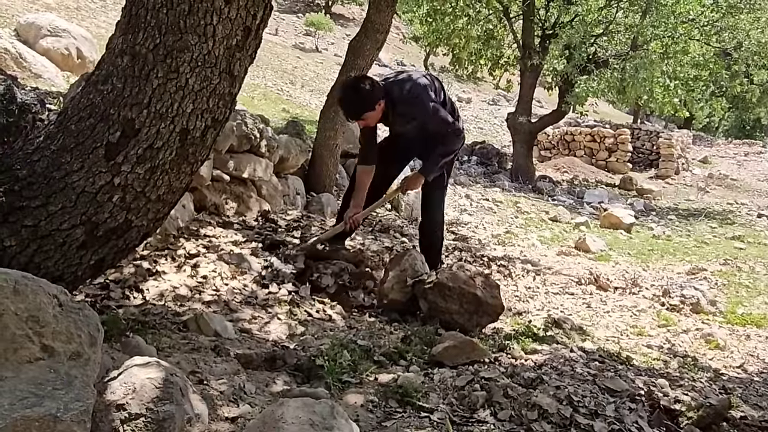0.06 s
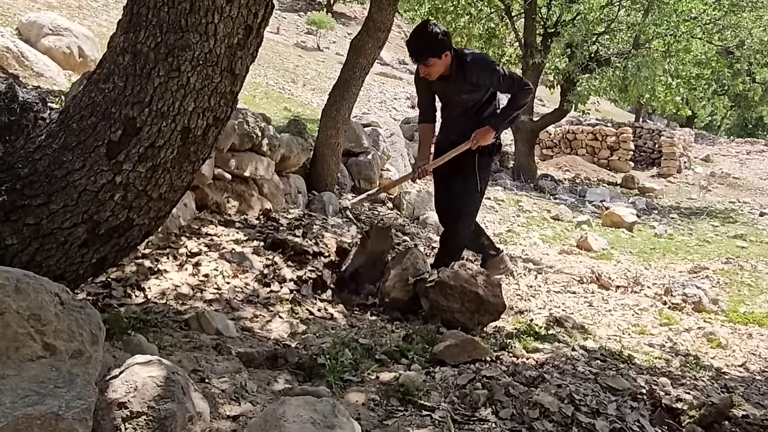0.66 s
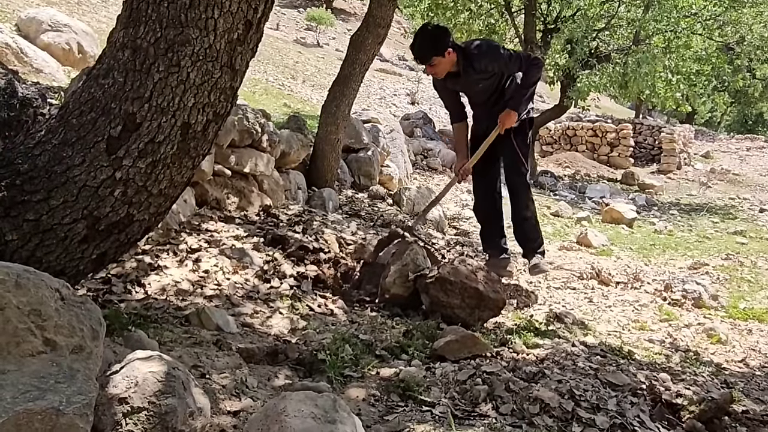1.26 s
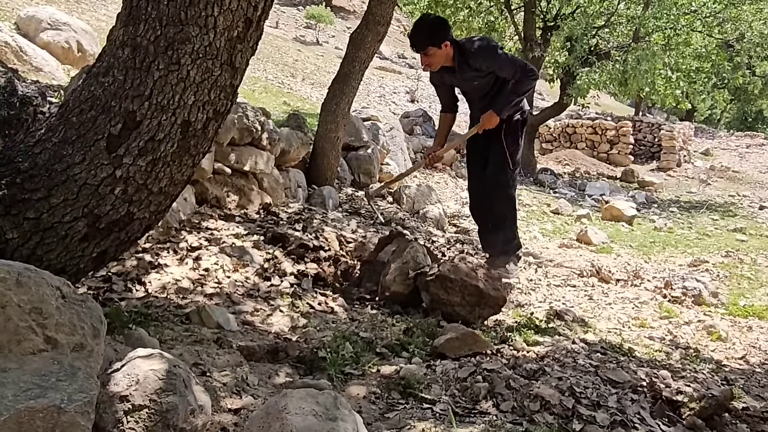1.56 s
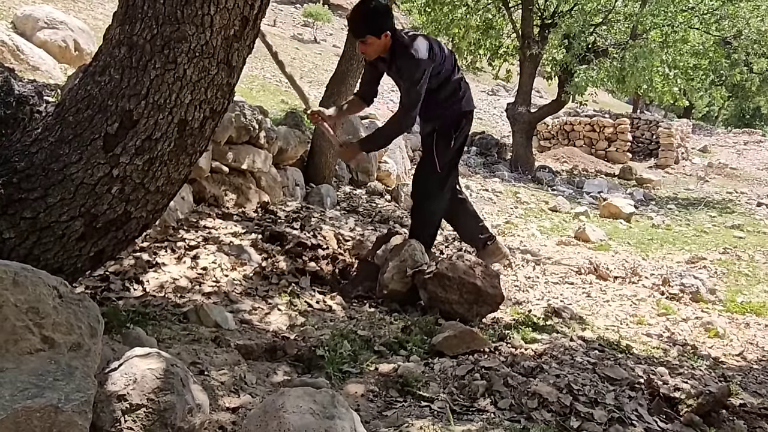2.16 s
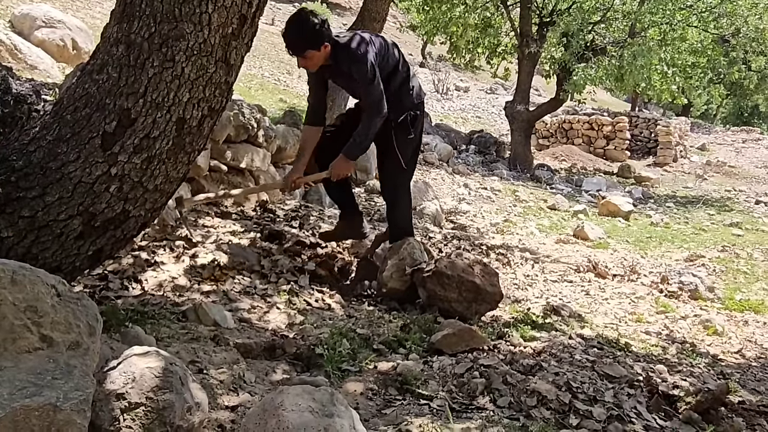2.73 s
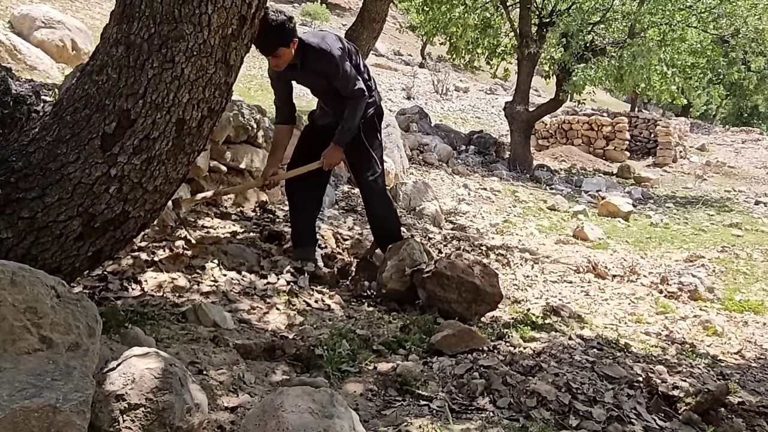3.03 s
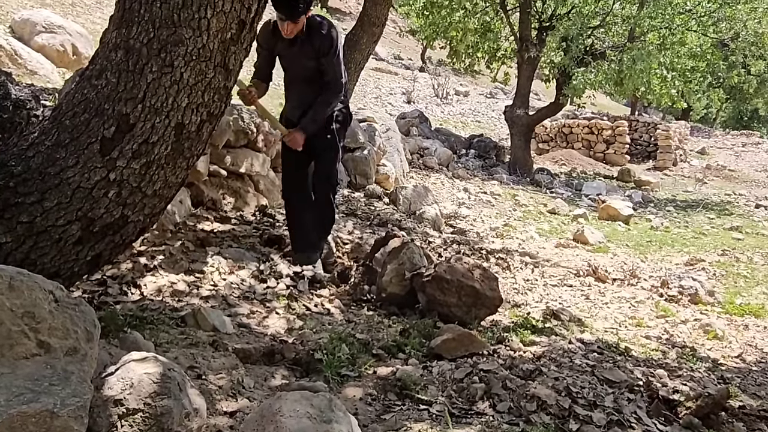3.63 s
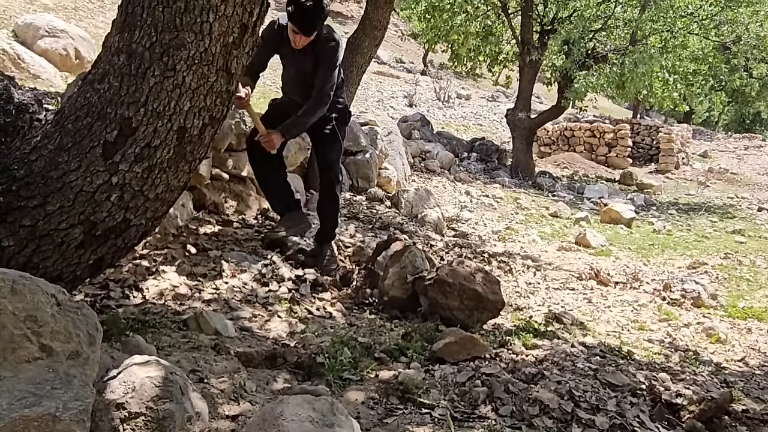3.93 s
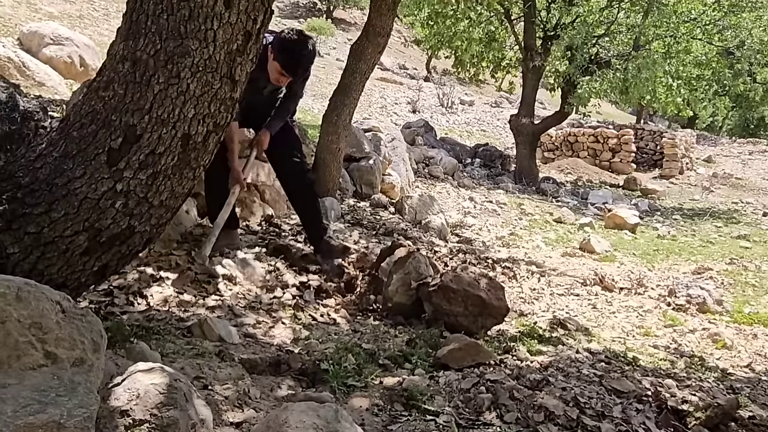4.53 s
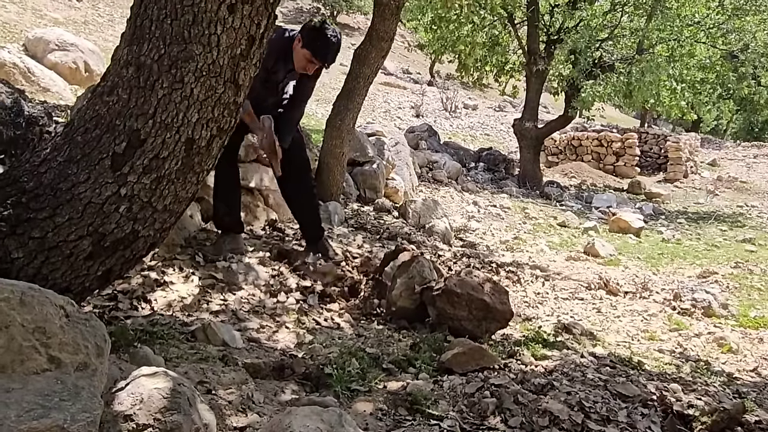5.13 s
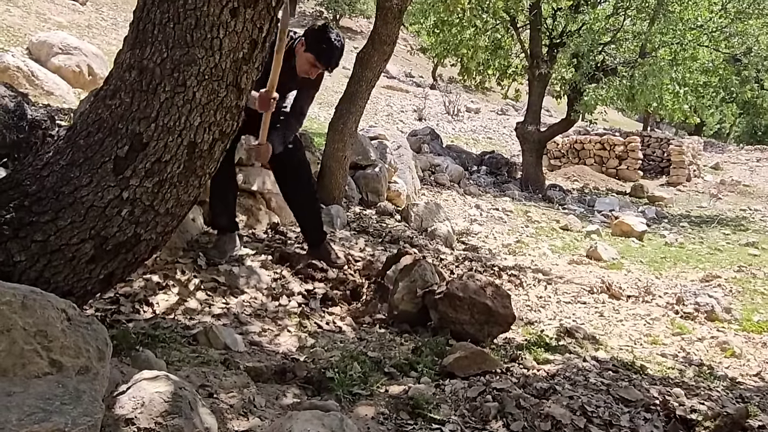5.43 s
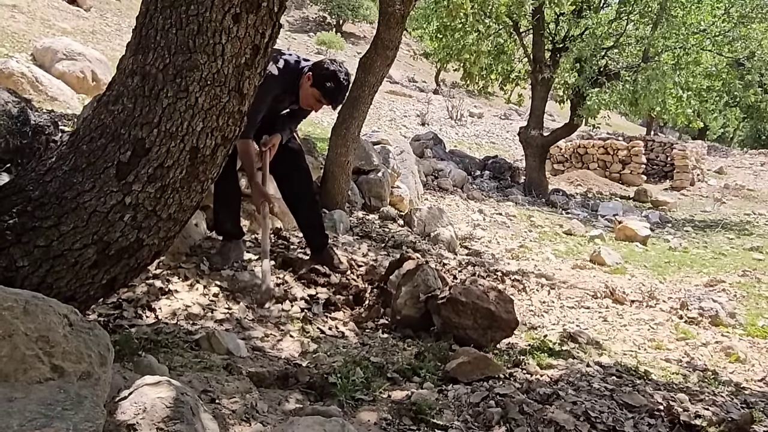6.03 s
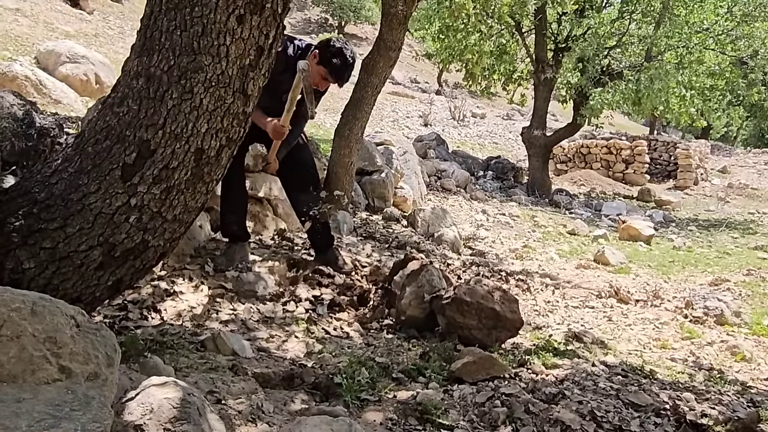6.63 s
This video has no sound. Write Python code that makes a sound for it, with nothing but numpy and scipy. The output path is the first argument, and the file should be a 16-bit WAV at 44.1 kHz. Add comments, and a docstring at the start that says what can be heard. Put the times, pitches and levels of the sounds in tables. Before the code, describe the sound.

For the first second and a half, a rock is dragged through loose rubble: gravel scrapes and rattles, chips click, and stones knock together with soft, low thuds. Small slides of gravel follow as the footing shifts. At about 2.4 seconds a pick hits stone with a sharp, loud clack, a brief steel ring and a spray of grit. Quieter stone knocks come near 2.8 and 3.5 seconds. At about 4.1 seconds a second loud blow lands with a fuller knock, followed by crunching gravel and a bright click. Rubble slides again around 5.2 seconds. A faint swish leads into a third, much softer blow that sinks into gravel at 5.7 seconds. Sand trickles, and another short slide comes near 6.6 seconds. The work sounds slightly to the left, outdoors with very little echo, over faint open air and a low distant rumble.

```python
"""Outdoors, among trees and dry stone walls, stony ground is worked with a pick.
A rock is dragged aside through loose rubble, then three blows fall: two clack on stone, the last
sinks into gravel. Each step or pull of the pick sets off a small slide that swells and dies away.
Stones knock, chips click and sand trickles over a low distant rumble."""
import sys
import numpy as np
from scipy import signal
from scipy.fft import rfft, irfft, next_fast_len
from scipy.io import wavfile
from scipy.ndimage import uniform_filter1d

SR = 44100
rng = np.random.default_rng(int(sys.argv[2]) if len(sys.argv) > 2 else 0)


def pcm_store(signal):
    """Save signal as 16-bit PCM."""
    levels = np.round(np.clip(np.atleast_2d(signal), -1, 1) * 32767)
    wavfile.write(sys.argv[1], SR, levels.astype(np.int16).T)


N = 299435

# The pick's blows. Each row: start in seconds, knock level in dB, knock treble limit in Hz, steel ring,
# crack and thud levels in dB, thud pitch in Hz, thud delay in seconds, grit spray level in dB,
# spray fade time in seconds, far echo level in dB.
BLOWS = [(2.3948, -17.5, 1800, -31, -9.5, -19.5, 105.3, 0.0025, -15.5, 0.18, -44),
         (4.1457, -8, 2423, -38, -10, -21.5, 85, 0.0075, -19, 0.22, -48),
         (5.6835, -26.5, 490, -50, -24, -27.5, 77, .020, -28.5, 0.17, -74)]
# The tone of fine grit. Each row, as in every tone table: frequency in Hz, relative level in dB.
GRIT_TONE = [(3500, -32), (5500, -2), (6500, -2), (7500, 0.5), (8600, -1), (9800, -2.5), (11500, -2.5),
             (13500, -7.5), (16000, -9)]


def from_db(db):
    """Turns decibels into a factor to multiply by."""
    return 10 ** (np.asarray(db) / 20)


def rms_one(x):
    """Scales a signal to an average (rms) strength of 1."""
    return x / np.sqrt(np.mean(x ** 2) + 1e-20)


def dying(t, t60):
    """A fade that starts at t = 0 and loses 60 dB in t60 seconds, the fade time."""
    return (t >= 0) * from_db(-60 * np.clip(t / t60, 0, 5))


def swell(start, rise_s, t60):
    """A level that rises, then dies away."""
    t = np.arange(N) / SR - start
    return np.clip(t / rise_s, 0, 1) * dying(np.maximum(t - rise_s, 0), t60)


def mode(t, hz, t60):
    """One fading note of a struck object."""
    return np.sin(2 * np.pi * hz * t) * dying(t, t60)


def ringing_of(modes, t):
    """All the notes of a struck object at once, neighbours swinging in opposite directions."""
    return sum((-1) ** k * from_db(db) * mode(t, hz, t60) for k, (hz, db, t60) in enumerate(modes))


def colour(x, tone):
    """Shapes noise to a tone table, falling away beyond its ends; strength 1."""
    size = next_fast_len(x.shape[-1])
    f = np.maximum(np.fft.rfftfreq(size, 1 / SR), 1)
    hz, db = np.transpose(tone)
    gain = from_db(np.interp(np.log(f), np.log(hz), db))
    gain *= np.minimum(f / hz[0], 1) ** 2 * np.minimum(hz[-1] / f, 1) ** 2
    return rms_one(irfft(rfft(x, size) * gain, size)[..., :x.shape[-1]])


def grains(per_s, size_db):
    """Two unrelated streams of tiny collisions, most small and a few large."""
    sizes = from_db(size_db * np.minimum(rng.exponential(1, (2, N)), 5))
    return rms_one(sizes * rng.choice([-1, 1], (2, N)) * (rng.random((2, N)) < per_s / SR))


def flicker(length_s, depth_db):
    """A level that wanders up and down at random."""
    slow = uniform_filter1d(rng.standard_normal(N), int(length_s * SR))
    return rms_one(from_db(depth_db * rms_one(slow)))


def add(track, start_s, sound):
    """Mixes a sound into a track at a given time."""
    first = int(start_s * SR)
    track[..., first:first + sound.shape[-1]] += sound[..., :N - first]


def spread(pair, alike):
    """Two unrelated signals become left and right, from unlike (0) to the same (1)."""
    return np.sqrt(1 + alike) * pair[0] + np.sqrt(1 - alike) * pair[1] * np.array([[1], [-1]])


def placed(x):
    """The work goes on a little to the left, so the right side hears it later and softer."""
    # Each row: time in seconds, delay on the right in milliseconds.
    delays = [(0, .05), (1.5, .05), (2.3, .2), (2.6, .2), (4.1, .145), (5.7, .13), (6.8, .11)]
    now = np.arange(N)
    lag = np.round(np.interp(now / SR, *np.transpose(delays)) * SR / 1000).astype(int)
    return np.array([x * from_db(.4), x[np.maximum(now - lag, 0)] * from_db(-.4)])


def background(air_db=-69.5):
    """A low distant rumble that wavers, and faint open air."""
    # The tones of both. Each row: frequency in Hz, relative level in dB.
    rumble_tone = [(20, -4), (40, -4), (60, 0.5), (90, -1.5), (140, -10), (190, -11), (240, -9),
                   (280, -17.5), (310, -27), (450, -43)]
    air_tone = [(320, -0.5), (480, 1.5), (800, -2), (1400, -6), (2000, -4.5), (2500, -11.5), (5000, -17.5),
                (8000, -24), (11000, -22.5), (16000, -30.5)]
    # The rumble's slow rise and fall. Each row: time in seconds, level in dB.
    rumble_levels = [(0, -58.5), (.6, -56.5), (1.1, -58.5), (2.2, -60), (3.1, -57), (3.6, -60.5),
                     (4.4, -56), (4.9, -59.5), (5.15, -56.5), (5.5, -60.5), (6.0, -59), (6.79, -60)]
    rumble_db = np.interp(np.arange(N) / SR, *np.transpose(rumble_levels))
    rumble = spread(colour(rng.standard_normal((2, N)), rumble_tone), alike=.9)
    rumble *= flicker(length_s=0.13, depth_db=1.0)
    air = spread(colour(rng.standard_normal((2, N)), air_tone), alike=0.2)
    return from_db(rumble_db) * rumble + from_db(air_db) * air


def rubble_motion():
    """How strongly stones, gravel and grit move: the dragged rock and all the slides add up."""
    # How hard the rock is dragged. Each row: time in seconds, gravel level in dB.
    drag = [(0.132, -76), (.29, -57), (.37, -53), (.45, -55.5), (.64, -53), (.88, -55.5), (1.03, -62),
            (1.28, -60.5), (1.55, -82.5)]
    # Slides set off by a step or a pull. Each row: start, rise time and fade time in seconds,
    # gravel level in dB, then stones and grit in dB above the gravel.
    slides = [(0, 0.0085, 0.071, -54, -9, -13.5), (.34, 0.026, 0.3, -53, -15, 4),
              (.62, 0.013, 0.19, -59, -1, 6), (1.629, .04, 0.68, -69.5, -10, 3.5),
              (1.854, 0.014, 1.5, -58, -6, -3), (2.01, 0.0094, 0.13, -55, -20, -1.5),
              (2.12, 0.0074, 2, -63.5, -2, -3), (2.52, 0.022, 2.03, -69, -10, 3.5),
              (2.809, 0.028, 0.23, -61.5, 3.5, 1), (3.1, 0.088, 0.97, -66, -8, 3),
              (3.47, 0.032, 0.47, -67.5, 2, 3.5), (3.591, 0.067, 1.45, -77, 1.5, 5.5),
              (4.22, 0.017, 2.16, -59, -6, 2), (4.33, 0.12, 0.66, -60, -7.5, 1.5),
              (4.6, 0.024, 1.7, -68.5, -3.5, 4), (5.02, .11, 0.57, -67.5, -4.5, 0),
              (5.212, 0.04, 0.58, -49.5, -8, 0.5), (5.374, 0.012, 0.18, -58.5, -3, 1),
              (5.799, 0.02, 0.47, -63, -15, 1), (5.89, .015, 0.85, -65.5, -7.5, 1.5),
              (6.229, 0.025, 1.34, -61, -6.5, 2), (6.576, 0.037, 0.21, -48, -9.5, 2.5),
              (6.65, 0.032, 0.97, -63.5, -5.5, 2)]
    drag_db = np.interp(np.arange(N) / SR, *np.transpose(drag), left=-np.inf, right=-np.inf)
    effort_db = drag_db + 55  # a harder pull raises the grit most and the stones least
    power = from_db([-61 + 0.74 * effort_db, drag_db, -55.5 + 1.15 * effort_db]) ** 2
    for start, rise_s, t60, db, stones_db, grit_db in slides:
        power += from_db([[db + stones_db], [db], [db + grit_db]]) ** 2 * swell(start, rise_s, t60) ** 2
    return np.sqrt(power)


def pebbles(low_hz, high_hz, per_s, size_db, cycles, count):
    """Single stones click at random, each size at its own pitch."""
    out, t = np.zeros(N), np.arange(SR // 16) / SR
    for hz in np.geomspace(low_hz, high_hz, count):
        hits = grains(per_s / count, size_db)[0]
        out += signal.oaconvolve(hits, mode(t, hz, cycles / hz) * np.sqrt(hz))[:N]
    return rms_one(out)


def ticks(grit, follows=.7, reference_db=-60):
    """Lone specks of grit keep hopping while a slide dies away."""
    strength = from_db(reference_db) * (grit / from_db(reference_db)) ** follows
    return from_db(-7) * strength * colour(grains(per_s=60, size_db=2.0)[0], GRIT_TONE)


def rubble():
    """Stones, gravel and grit collide as they stick and slip; single pebbles and cobbles stand out."""
    # The tones of stones and gravel. Each row: frequency in Hz, relative level in dB.
    stone_tone = [(250, -17.5), (420, 4), (700, -1), (1000, -8), (1400, -2.5), (2000, -17.5)]
    gravel_tone = [(900, -12), (1450, -1.5), (2200, 0.5), (3200, 3), (4500, 1), (5500, -3.5), (7500, -33)]
    stone, gravel, grit = rubble_motion() * flicker(length_s=0.025, depth_db=1.47)
    clatter = spread(colour(grains(per_s=1800, size_db=0.5), stone_tone), alike=0.6)
    rattle = spread(colour(grains(per_s=4000, size_db=1.0), gravel_tone), alike=0.043)
    hiss = spread(colour(grains(per_s=9000, size_db=0.5), GRIT_TONE), alike=0.067)
    small = pebbles(low_hz=1500, high_hz=9150, per_s=63, size_db=2.0, cycles=22, count=14)
    large = pebbles(low_hz=480, high_hz=1300, per_s=74, size_db=0.5, cycles=31, count=7)
    singles = from_db(-8) * np.sqrt(gravel * grit) * small + from_db(-6) * stone * large + ticks(grit)
    return stone * clatter + gravel * rattle + from_db(-1.5) * grit * hiss + placed(singles)


def knocks(crunch_db=-13.0):
    """A stone rocks onto its neighbour: three short notes and a crunch around the same pitch."""
    # Each row: start in seconds, level in dB, pitch in Hz, fade time in seconds.
    stones = [(.304, -35, 720, 0.023), (.622, -33, 800, 0.051), (.623, -34, 430, 0.045),
              (0.636, -37, 510, 0.059), (0.68, -32, 640, 0.021), (.980, -33.5, 1710, 0.017),
              (.981, -41.5, 2550, 0.032), (1.271, -30.5, 1195, 0.037), (1.276, -29, 547, 0.018),
              (1.972, -42.5, 520, 0.076), (2.801, -37, 633, 0.05), (2.834, -44, 703, .06),
              (3.502, -32.5, 641, .062), (3.506, -34.5, 374.5, 0.05), (4.424, -44, 1420, .08),
              (4.525, -47.5, 728, 0.076), (4.612, -40, 505, 0.036), (4.642, -45, 687, .06),
              (4.776, -43.5, 1225, .069), (5.389, -42.5, 630, 0.038), (5.391, -38.5, 1236, 0.029),
              (6.262, -47.5, 693, .1)]
    out, t = np.zeros(N), np.arange(SR // 5) / SR
    onset = 1 - np.exp(-t / .001)
    for start, db, hz, t60 in stones:
        body = mode(t, hz, t60) - .4 * mode(t, hz * .88, t60 * .7) + .3 * mode(t, hz * 1.23, t60 * .6)
        tone = [(hz * .45, -8), (hz, 0), (hz * 1.7, -11), (hz * 4, -22)]
        crunch = from_db(crunch_db) * colour(rng.standard_normal(len(t)), tone) * dying(t, t60)
        add(out, start, from_db(db) * (.5 * body + crunch) * onset)
    return out


def echoes(x, early_db=1.5, far_db=-16.0, delay_s=0.016):
    """Rocks and trunks scatter the sound at once; the trees further off return a faint tail."""
    # The tone of the echoes. Each row: frequency in Hz, relative level in dB.
    wall_tone = [(150, -16), (400, -17), (900, -22), (1400, -24.5), (2200, -22.5), (3300, -2), (6000, 4),
                 (9000, -2.5), (16000, -2.5)]
    t = np.arange(SR) / SR - delay_s
    early, far = dying(t, t60=0.15), dying(t, t60=0.94)
    fade = from_db(early_db) * early / np.linalg.norm(early) + from_db(far_db) * far / np.linalg.norm(far)
    reflections = colour(rng.standard_normal((2, SR)), wall_tone) * fade
    return signal.fftconvolve(x[None], reflections, axes=1)[:, :N]


def chips(click_db=-6.5, ring_db=-11.0):
    """Small flakes of stone land with a dry, bright click and ring briefly."""
    # Each row: start in seconds, level in dB, pitch in Hz.
    flakes = [(.3586, -34.5, 4200), (0.5608, -33, 3780), (2.0203, -42, 3000), (2.096, -50, 2980),
              (2.1375, -41.5, 3220), (2.217, -45, 6180), (3.5993, -43, 4420), (4.2162, -22, 4960),
              (4.468, -33.5, 3970), (4.705, -42.5, 5430), (4.776, -45, 5460), (5.093, -42.5, 5800),
              (5.3898, -32.5, 3430), (5.443, -44, 5580), (5.5169, -46, 3570), (5.8092, -45, 7300),
              (5.901, -43, 7470), (5.9638, -44, 7230)]
    out, t = np.zeros(N), np.arange(SR // 10) / SR
    for start, db, hz in flakes:
        tone = [(hz * .3, -6), (hz * .8, -3), (hz, 0), (hz * 1.25, -5), (hz * 2.6, -13)]
        click = colour(rng.standard_normal(len(t)), tone) * dying(t, t60=.022)
        add(out, start, from_db(db + click_db) * click + from_db(db + ring_db) * mode(t, hz, t60=.035))
    return out


def thuds(rise_s=.004):
    """The ground takes the weight of each settling rock and each blow."""
    # Heavy rocks settling. Each row: start in seconds, level in dB, pitch in Hz.
    bumps = [(0.623, -45, 125), (.80, -49, 97), (1.273, -44.5, 96)]
    # The ground's notes. Each row: multiple of the pitch, relative level in dB, fade time in seconds.
    ground = [(1, 7.5, 0.069), (1.42, 0, 0.07), (2.2, -7, 0.06)]
    strikes = [(start + delay, db, hz) for start, _, _, _, _, db, hz, delay, *_ in BLOWS]
    out, t = np.zeros(N), np.arange(SR // 2) / SR
    for start, db, hz in bumps + strikes:
        thud = sum(from_db(db + note_db) * mode(t, hz * ratio, t60) for ratio, note_db, t60 in ground)
        add(out, start, thud * (1 - np.exp(-t / rise_s)))
    return out


def blows(crush_s=0.0032, scatter_hz=2600):
    """The tip crushes stone for a moment, the pick rings and grit flies."""
    # The notes of the handle with the stone under the tip, and of the steel head.
    # Each row: pitch in Hz, relative level in dB, fade time in seconds.
    handle_notes = [(157, -11, .055), (246, -11.5, 0.042), (408, -10, .05), (590, -6, 0.049),
                    (812, -11.5, .047), (945, -10.5, 0.047), (1160, -6.5, 0.043), (1306, -2, .03),
                    (1528, -4.5, 0.043)]
    steel_notes = [(2450, -7, .04), (3024, -5, .1), (3136, -2, .12), (3520, -8, .1), (3745, -4, .12),
                   (3954, -7, .11), (4093, -8, .1), (4359, -6, .08), (4593, -8, .09), (5444, -14, .12),
                   (5588, -14, .1), (7311, -18, .09), (8680, -7, .06), (8740, -10, .06), (8870, -9, .07)]
    # One tone per blow (bare rock, buried stone, gravel), then the tone that the trees send back.
    # Each row: frequency in Hz, relative level in dB.
    crack_tones = [
        [(130, 2.5), (230, 2.5), (320, -10), (420, -3.5), (650, -5.5), (850, -9), (1450, 2), (2400, -2),
         (3200, -1), (4600, -11), (6900, -13.5), (8000, -11.5), (8750, -5), (9800, -16), (16000, -27)],
        [(120, 4), (220, -9.5), (450, -8.5), (620, -1.5), (900, -5), (1100, -7), (1450, 2), (1950, -10),
         (3100, -4), (4400, -9), (5600, -17.5), (7600, -23.5), (10000, -19.5), (16000, -33.5)],
        [(260, 1), (400, 7.5), (560, -2), (800, 3.5), (1050, -12), (1600, -2), (4300, -1), (6000, -7),
         (8000, 2.5), (10000, -6), (16000, -7)],
    ]
    far_tone = [(600, -13.5), (1500, -5), (2200, -3), (3400, 0), (4600, -6.5), (6500, -14.5), (9000, -16),
                (16000, -30.5)]
    rings, cracks, spray, t = np.zeros(N), np.zeros(N), np.zeros((2, N)), np.arange(SR) / SR
    knock, steel = ringing_of(handle_notes, t), ringing_of(steel_notes, t)
    crush = np.minimum(t / .0012, 1) * dying(np.maximum(t - crush_s, 0), t60=.024)
    for blow, tone in zip(BLOWS, crack_tones):
        start, knock_db, top_hz, ring_db, crack_db, _, _, _, spray_db, spray_t60, far_db = blow
        # a softer contact gives a duller knock
        dulled = signal.sosfilt(signal.butter(2, top_hz, fs=SR, output="sos"), knock)
        add(rings, start, from_db(knock_db) * dulled + from_db(ring_db) * steel)
        add(cracks, start, from_db(crack_db) * colour(rng.choice([-1., 1.], len(t)), tone) * crush)
        # flying grit keeps the treble of the crack
        grit = colour(grains(per_s=11000, size_db=3.0)[:, :len(t)], tone)
        grit = signal.lfilter(*signal.butter(1, scatter_hz, "high", fs=SR), grit)
        near = from_db(spray_db) * grit * dying(t, spray_t60)
        far = from_db(far_db) * colour(rng.standard_normal((2, len(t))), far_tone) * dying(t, t60=0.81)
        add(spray, start, (near + far) * np.minimum(t / 0.001, 1))
    return rings, cracks, spray


def crunches():
    """Gravel gives way in a short burst as the pick enters or twists."""
    # Each row: start in seconds, level in dB, seconds before it fades.
    bursts = [(4.138, -33.5, 0.009), (4.203, -43, 0.012), (4.217, -38.5, 0.008), (5.693, -47.5, .006)]
    # The tone of crushed gravel. Each row: frequency in Hz, relative level in dB.
    tone = [(500, -3), (1300, 3), (2500, -1), (5000, 0), (8000, -1), (11000, -4), (16000, -12)]
    out, t = np.zeros(N), np.arange(SR // 10) / SR
    for start, db, hold_s in bursts:
        burst = colour(grains(per_s=15000, size_db=2.0)[0, :len(t)], tone)
        add(out, start, from_db(db) * burst * dying(np.maximum(t - hold_s, 0), t60=0.038))
    return out


def sand_and_swish():
    """A thin, high rustle of trickling sand, and the swish of the pick's swing before the last blow."""
    # Each row: start, rise time and fade time in seconds, level in dB.
    rustles = [(4.95, 0.082, 1.0, -70), (5.6, 0.13, 0.38, -60), (5.82, .13, 0.73, -70),
               (6.21, .03, 1.6, -63)]
    # Their tone. Each row: frequency in Hz, relative level in dB.
    tone = [(6000, -7), (7100, 6.5), (8700, 0.5), (10000, -10)]
    level = sum(from_db(db) * swell(start, rise_s, t60) for start, rise_s, t60, db in rustles)
    return level * spread(colour(grains(per_s=2400, size_db=4.0), tone), alike=0.1)


def scene(lean_left_db=.75):
    """Blows, knocks and rubble sound a little to the left; the thuds stay in the middle."""
    rings, cracks, spray = blows()
    ringing = rings + knocks()
    loose = (rubble() + sand_and_swish() + spray) * from_db([[lean_left_db], [-lean_left_db]])
    hits = placed(ringing + cracks + crunches() + chips())
    return hits + thuds() + echoes(ringing) + loose + background()


def record(dry, ceiling=1.2, cutoff_hz=16200):
    """Rounds off the loudest peaks and cuts the highest treble."""
    rounded = ceiling * np.tanh(dry / ceiling)
    return signal.sosfilt(signal.ellip(10, .2, 80, cutoff_hz, fs=SR, output="sos"), rounded)


dry = scene()
out = record(dry)
pcm_store(out)
```